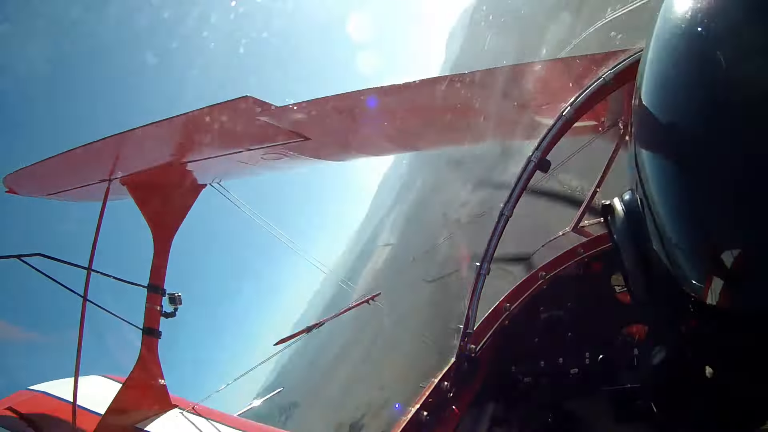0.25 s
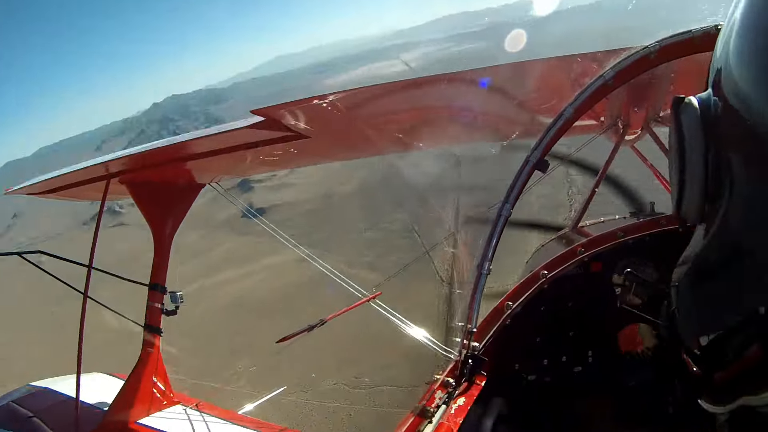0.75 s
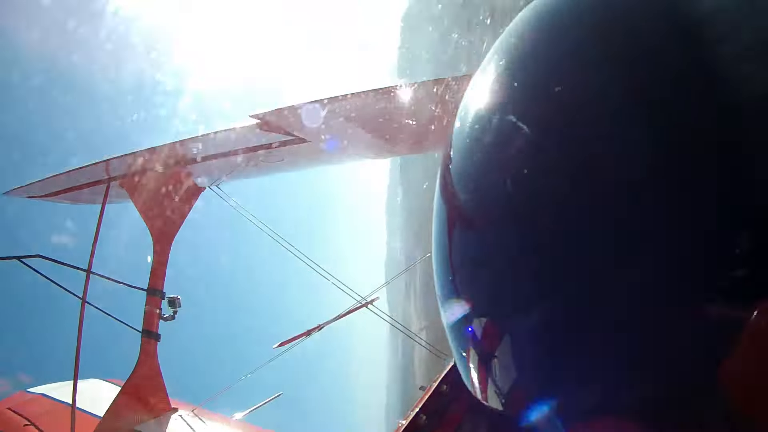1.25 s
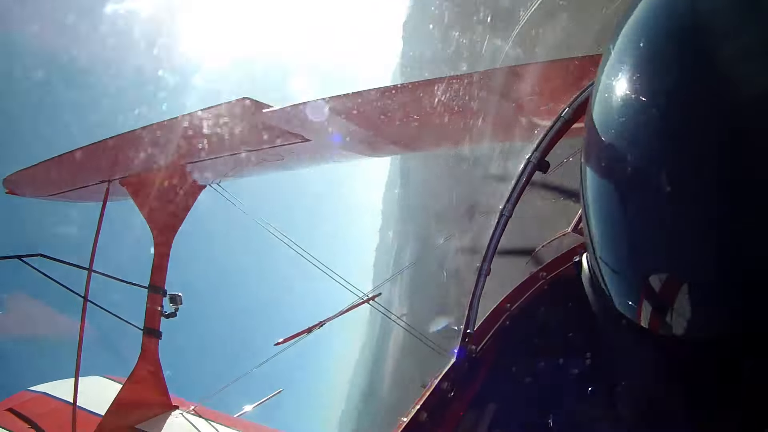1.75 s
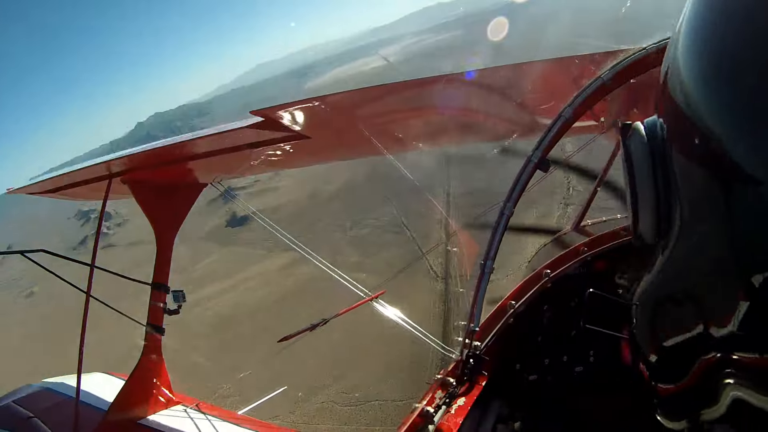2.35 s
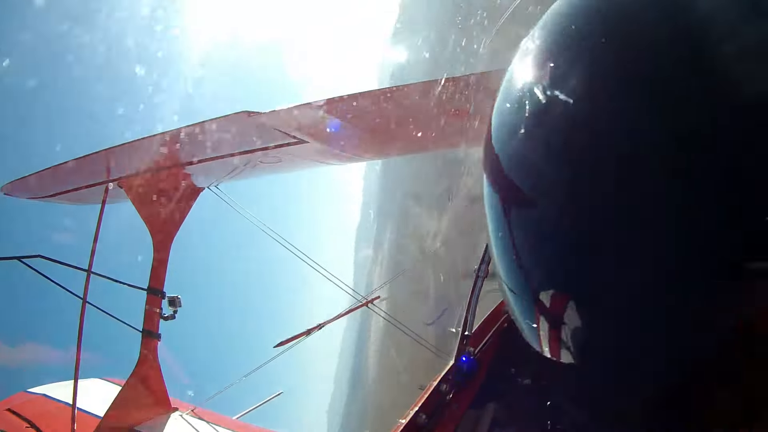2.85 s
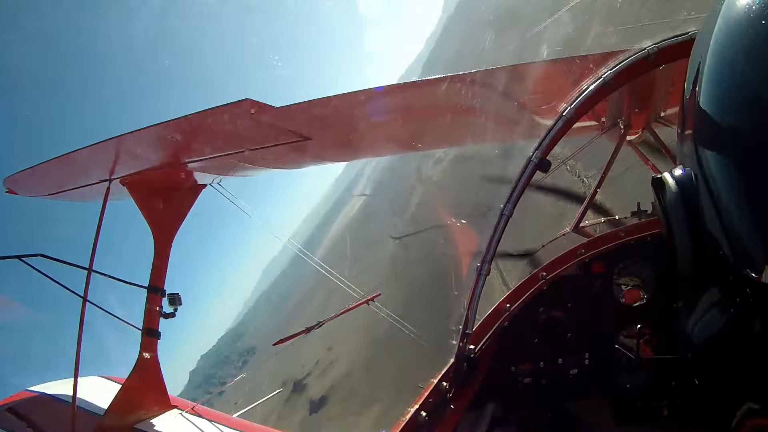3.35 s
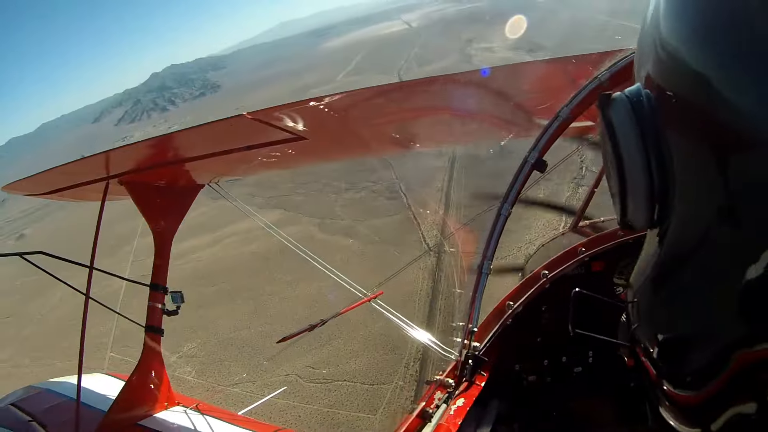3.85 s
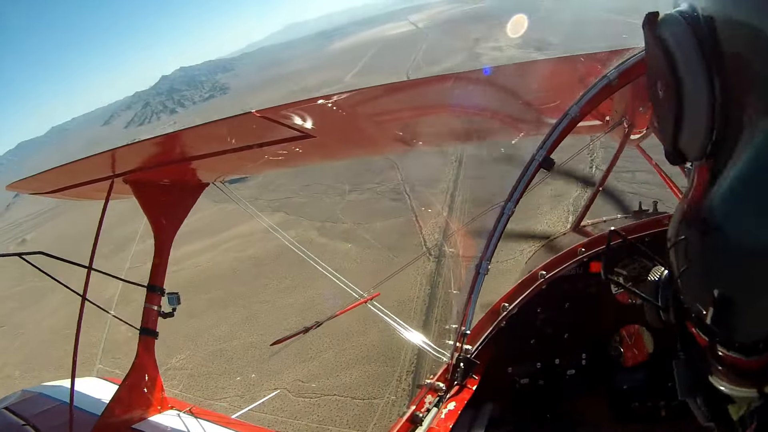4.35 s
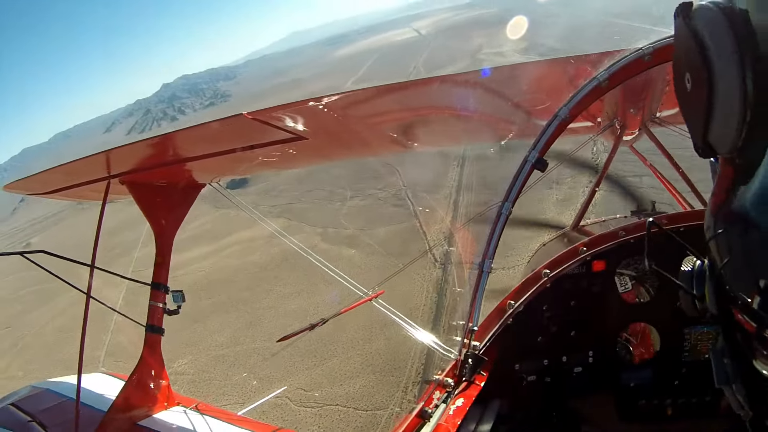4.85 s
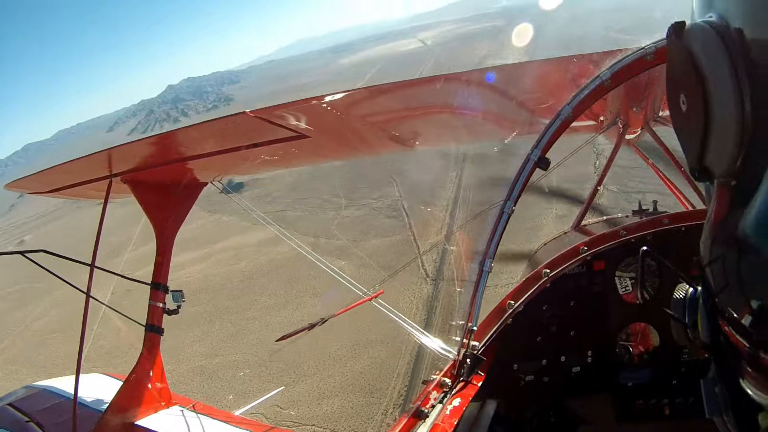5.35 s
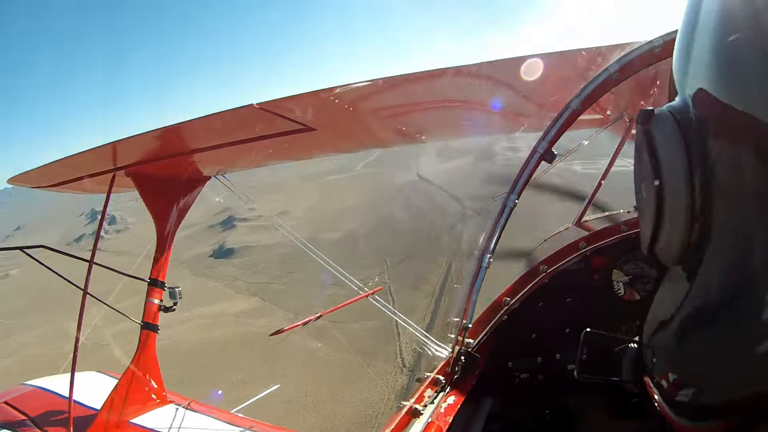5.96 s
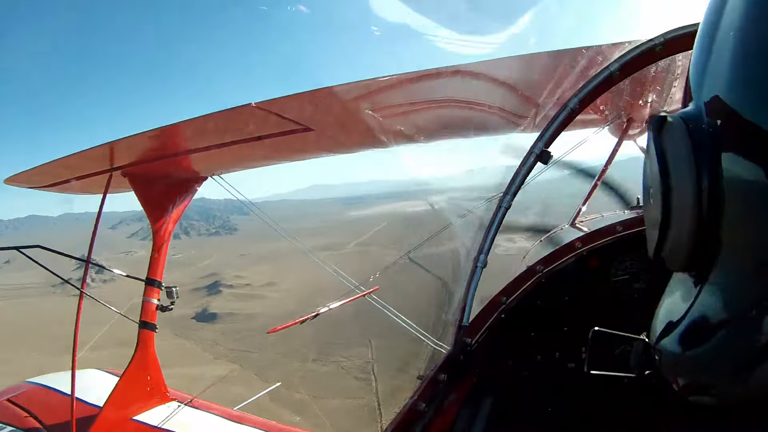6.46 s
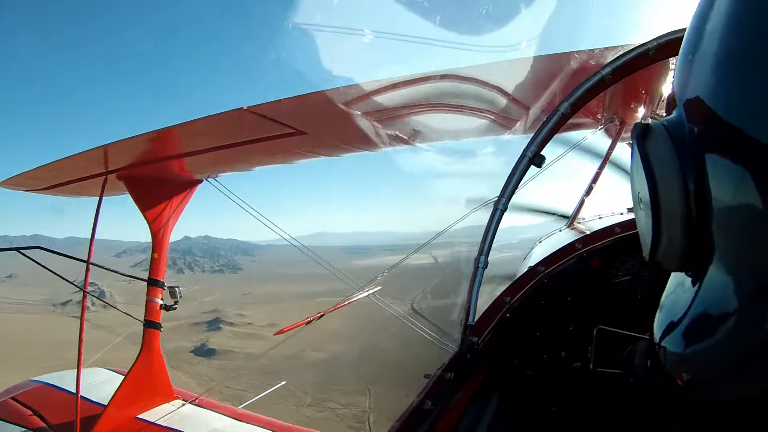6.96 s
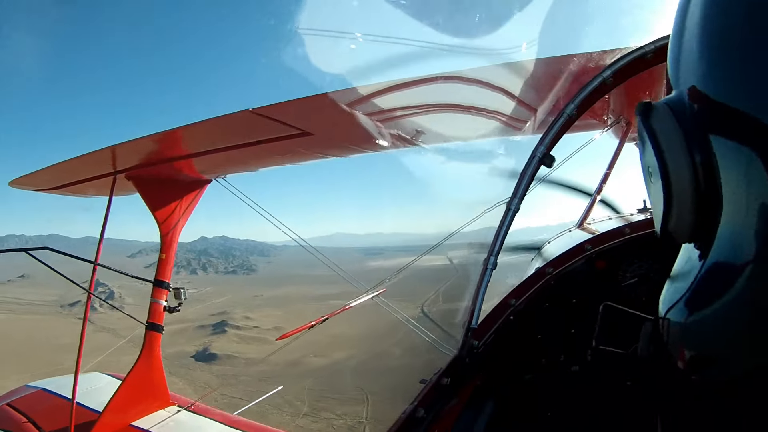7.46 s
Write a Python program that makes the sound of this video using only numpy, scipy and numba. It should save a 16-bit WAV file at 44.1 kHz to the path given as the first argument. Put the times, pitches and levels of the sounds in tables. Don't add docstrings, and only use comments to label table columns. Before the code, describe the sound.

A dense aircraft engine drone fills the cockpit from the start, rough and shaking during a hard roll, then gently hunting in pitch through further turns. As the plane levels out, the note climbs a little and falls back to a steady hum with altered colour. Airflow rushes, flutters and hisses throughout. The microphone inside the canopy clips, giving thin bass and a crunchy, compressed sound.

```python
import sys
import numpy as np
from scipy import signal
from scipy.fft import rfft, irfft, next_fast_len
from scipy.io import wavfile
from scipy.ndimage import uniform_filter1d, map_coordinates
from numba import njit

SR = 44100
rng = np.random.default_rng(int(sys.argv[2]) if len(sys.argv) > 2 else 0)


def boost_factor(decibels):
    exponent = np.asarray(decibels, float) / 20
    return 10 ** exponent


def put_to_file(sound):
    columns = np.atleast_2d(sound).T
    safe = np.clip(columns, -1, 1)
    whole_steps = np.round(safe * 32767)
    wavfile.write(sys.argv[1], SR, whole_steps.astype(np.int16))


N = 340452

# shaft_order, rolling_db, level_flight_db, surge_change_db, hard_entry_change_db
FIRING_TONES = [
    (3, -18, -18, -2.5, -0.1),
    (4, -33, -28.5, 6, 4),
    (5, -30.5, -45, 1, 1.5),
    (6, -37, -23.5, -3.5, 6),
]
# shaft_order, level_db
UNEVEN_TONES = [(1, -40.5), (1.5, -47), (2, -46), (2.5, -42.5), (7, -45.5), (8, -39.5), (9, -40), (12, -42)]
# time_s, airflow_db
AIRFLOW = [(0, -35.5), (.15, -36), (.65, -36.5), (1.1, -36.5), (2.0, -35), (2.2, -36), (2.42, -32.5),
           (2.9, -36.5), (3.45, -34), (3.65, -36), (4.2, -34.5), (4.6, -33.5), (5.35, -34.5), (5.7, -35),
           (6.05, -33), (6.7, -34.5), (7.45, -34), (7.72, -34)]
# time_s, strength_db
GUSTS = [(0.14, 4), (0.29, 4), (0.39, 3.5), (0.885, 4.5), (2.111, 3.5), (2.238, 3), (3.03, 2), (3.17, 4),
         (4.067, 3), (4.126, 3), (4.284, 3), (5.644, 3), (6.201, 3), (6.514, 1.5), (7.13, 2.5), (7.455, 4)]
# frequency_hz, density_db
BUFFET_SPECTRUM = [(10, -34.5), (20, -12), (30, -10.5), (45, -1), (70, 1.5), (110, 3), (140, -9.5),
                   (200, -39)]
# frequency_hz, density_db
ROAR_SPECTRUM = [(70, -59), (110, -3.5), (160, 2), (250, 0.5), (330, -4), (500, -5), (640, -8.5),
                 (720, -13.5), (900, -15), (1200, -68), (2000, -81)]
# frequency_hz, density_db
HISS_SPECTRUM = [(530, -31), (900, -8.5), (974, 1), (1450, -0.5), (2310, -1), (3130, -7.5), (4770, -24),
                 (6000, -73), (7800, -52), (13200, -120)]
# frequency_hz, density_db
WHISTLE_SPECTRUM = [(4000, -30), (5000, -10.5), (6100, -7), (6600, 0), (7300, -2), (8300, -5.5),
                    (10000, -2), (11200, -5.5), (11600, -3), (12700, -6.5), (13400, -2.5), (14200, .5),
                    (14700, -3), (15400, -3)]

LOW_CUT_HZ, TOP_HZ = 210, 15310
ROLL_S, FASTEST_S = 1.5, 0.1992
LEVEL_OUT_S, LEVEL_OUT_TAKES_S = 3.85, 0.15
ENTRY_HOLD_S, ENTRY_FADE_S = 0.98, 0.17
ROLLING_HZ, LEVEL_HZ, HUNT_HZ = 45.15, 44.9, 0.498
SURGE_START_S, SURGE_RISE_S, SURGE_HZ = 3.85, 0.37, 1.75
SETTLE_S = 0.98
WANDER_DB, ROLL_WANDER = 0.38, 1.7
BUFFET_DB, BUFFET_WANDER_DB = -29.45, 0.8
BUFFET_LEVEL_DB, BUFFET_ROLL_DB, BUFFET_SURGE_DB = -0.5, 2, 2
ROAR_OVER_AIRFLOW_DB = 11.5
ROAR_LEVEL_DB, ROAR_ROLL_DB, ROAR_ENTRY_DB = 0.5, 0.5, 2
GAP_ROLLING_DB, GAP_LEVEL_DB, GAP_ROLL_DB = 1.5, -0.4, 0.5
LIP_HZ, LIP_WIDTH_HZ, LIP_DB = 2600, 210, 1
WHISTLE_LEVEL_DB = -1
SEAL_HZ, SEAL_WIDTH_HZ, SEAL_DB = 5400, 120, 7


def unit(x):
    return x / np.sqrt(np.mean(x ** 2) + 1e-20)


def wobble(rate_hz):
    knots = rng.standard_normal(int(N * rate_hz / SR) + 4)
    return map_coordinates(knots, [np.arange(N) * rate_hz / SR])


def filtered(x, response):
    m = next_fast_len(N + SR // 2)
    return irfft(rfft(x, m) * response(np.fft.rfftfreq(m, 1 / SR) + 1), m)[..., :N]


def low_cut(hz):
    return 1j * hz / (LOW_CUT_HZ + 1j * hz)


def resonance(x, centre_hz, width_hz):
    return filtered(x, lambda hz: np.exp(-((hz - centre_hz) / width_hz) ** 2))


def manoeuvre():
    t = np.arange(N) / SR
    level = 0.5 + 0.5 * np.tanh((t - LEVEL_OUT_S) / LEVEL_OUT_TAKES_S)
    roll = (1 - level) * np.cos(2 * np.pi * (t - FASTEST_S) / ROLL_S)
    u = np.clip(t - SURGE_START_S, 0, None) / SURGE_RISE_S
    surge = (u * np.exp(1 - u)) ** 2
    entry = 0.5 - 0.5 * np.tanh((t - ENTRY_HOLD_S) / ENTRY_FADE_S)
    return level, roll, surge, entry


def engine():
    level, roll, surge, entry = manoeuvre()
    shaft_hz = ROLLING_HZ + (LEVEL_HZ - ROLLING_HZ) * level + HUNT_HZ * roll + SURGE_HZ * surge
    turn = 2 * np.pi * np.cumsum(shaft_hz) / SR
    after = np.clip(np.arange(N) / SR - SURGE_START_S - SURGE_RISE_S, 0, None)
    colour = np.maximum(surge, 0.54 * (after > 0) * np.exp(-after / SETTLE_S))
    drift_db = WANDER_DB * (1 + (ROLL_WANDER - 1) * (0.5 - level))
    tones = list(UNEVEN_TONES)
    for order, rolling_db, level_db, surge_db, entry_db in FIRING_TONES:
        db = rolling_db + (level_db - rolling_db) * level + surge_db * colour + entry_db * entry
        tones.append((order, db + drift_db * (order - 2) * wobble(2.91)))
    drone = np.zeros(N)
    for order, db in tones:
        unsteady = boost_factor(db + 0.13 * order * wobble(12)) / abs(low_cut(order * shaft_hz))
        drone -= np.sqrt(2) * unsteady * np.cos(order * turn + 0.087 * order * wobble(5))
    return drone


def patches(shape, bins, frames):
    field = uniform_filter1d(rng.standard_normal(shape), size=bins, axis=0)
    return unit(uniform_filter1d(field, size=frames, axis=1))


def rush(spectrum, patchy_db):
    z = signal.stft(rng.standard_normal(N), nperseg=512)[2]
    field = patches(z.shape, 6, 6) + 0.7 * patches(z.shape, 12, 60)
    white = signal.istft(z * boost_factor(patchy_db * field), nperseg=512)[1][:N]
    f, db = np.transpose(spectrum)
    return unit(filtered(white, lambda hz: boost_factor(np.interp(np.log(hz), np.log(f), db))))


def airflow():
    time_s, db = np.transpose(AIRFLOW)
    return np.interp(np.arange(N) / SR, time_s, db)


def gusts():
    t = np.arange(N) / SR
    slaps_db = sum(1.8 * db * np.exp(-((t - s) / 0.007) ** 2) for s, db in GUSTS)
    return slaps_db + 0.6 * wobble(24)


def fabric_roar(gust_db):
    level, roll, surge, entry = manoeuvre()
    db = airflow() + ROAR_OVER_AIRFLOW_DB + gust_db + 0.26 * wobble(12)
    db += ROAR_LEVEL_DB * level - ROAR_ROLL_DB * roll + ROAR_ENTRY_DB * entry
    return boost_factor(db) * rush(ROAR_SPECTRUM, patchy_db=0.5)


def buffet():
    level, roll, surge, entry = manoeuvre()
    db = BUFFET_DB + BUFFET_WANDER_DB * wobble(4)
    db += BUFFET_LEVEL_DB * level + BUFFET_ROLL_DB * roll + BUFFET_SURGE_DB * surge
    return boost_factor(db) * rush(BUFFET_SPECTRUM, patchy_db=0.8)


def canopy_hiss(gust_db):
    level, roll, surge, entry = manoeuvre()
    gap_db = GAP_ROLLING_DB + (GAP_LEVEL_DB - GAP_ROLLING_DB) * level + GAP_ROLL_DB * roll
    hiss = boost_factor(airflow() + 0.17 + gust_db) * rush(HISS_SPECTRUM, patchy_db=-0.26)
    edge = filtered(hiss, lambda hz: 1 / (1 + (2900 / hz) ** 8))
    lip = resonance(hiss, LIP_HZ, LIP_WIDTH_HZ)
    lip_db = LIP_DB * np.maximum(level, entry * (1 - roll) / 2)
    return hiss + (boost_factor(gap_db) - 1) * edge + (boost_factor(lip_db) - 1) * lip


def canopy_whistle(gust_db):
    level, roll, surge, entry = manoeuvre()
    db = airflow() - 6.5 + WHISTLE_LEVEL_DB * level + gust_db
    whistle = boost_factor(db) * rush(WHISTLE_SPECTRUM, patchy_db=1.2)
    return whistle + (boost_factor(SEAL_DB * surge) - 1) * resonance(whistle, SEAL_HZ, SEAL_WIDTH_HZ)


def slipstream():
    gust_db = gusts()
    flow = fabric_roar(gust_db) + buffet() + canopy_hiss(gust_db) + canopy_whistle(gust_db)
    return filtered(flow, lambda hz: 1 / abs(low_cut(hz)))


def scene():
    return (engine() + slipstream())[None]


@njit
def ducking(x, rail, attack, full, recover, follow):
    out, wanted, gain = np.empty_like(x), 1.0, 1.0
    for i in range(len(x)):
        out[i] = gain * x[i]
        if abs(out[i]) > rail:
            wanted *= attack
        else:
            wanted += recover * (full - wanted)
        gain += follow * (wanted - gain)
    return out


def band_limit(x):
    return signal.sosfilt(signal.butter(12, 16030, fs=SR, output="sos"), x)


def record(dry):
    rail, ceiling, full_db = 0.55, 0.503, 8
    duck_db_per_s, recover_s, lag_s = 1900, 0.088, 0.0015
    attack = boost_factor(-duck_db_per_s / SR)
    held = ducking(dry[0], rail, attack, boost_factor(full_db), 1 / (recover_s * SR), 1 / (lag_s * SR))
    clipped = np.clip(held, -rail, rail)
    coupled = np.clip(filtered(clipped - clipped[0], low_cut), -ceiling, ceiling)
    mix = filtered(coupled, lambda hz: hz < TOP_HZ)[None]
    return band_limit(mix)


dry = scene()
out = record(dry)
put_to_file(out)
```